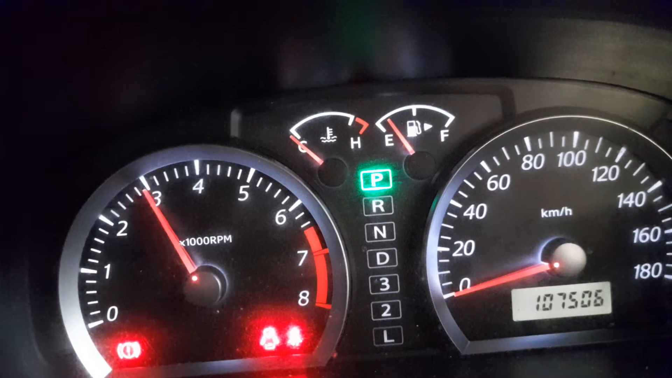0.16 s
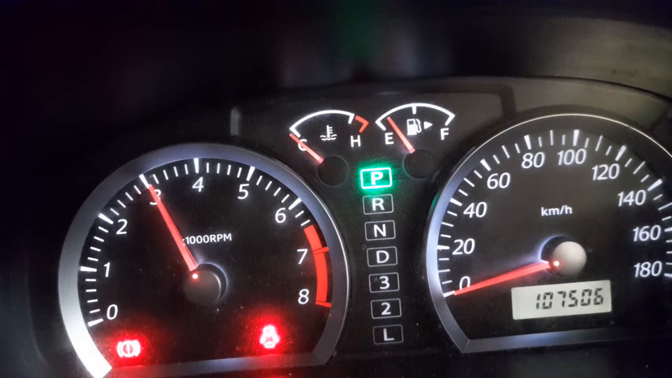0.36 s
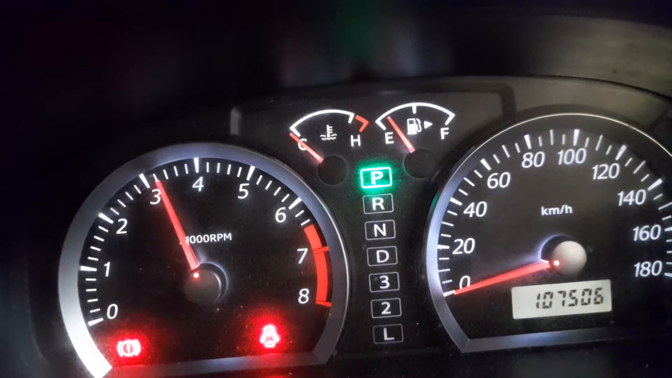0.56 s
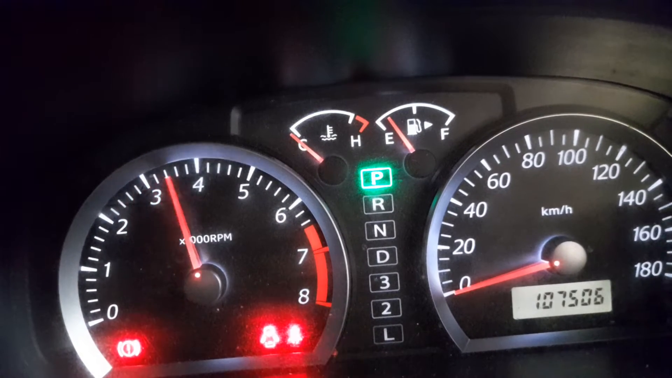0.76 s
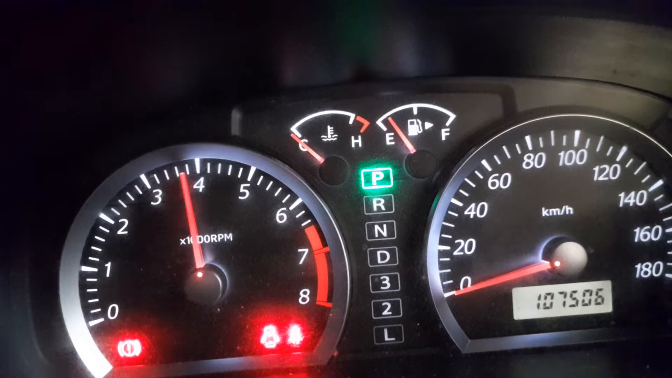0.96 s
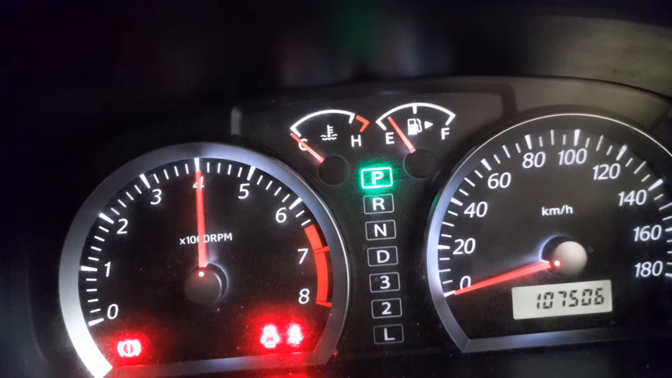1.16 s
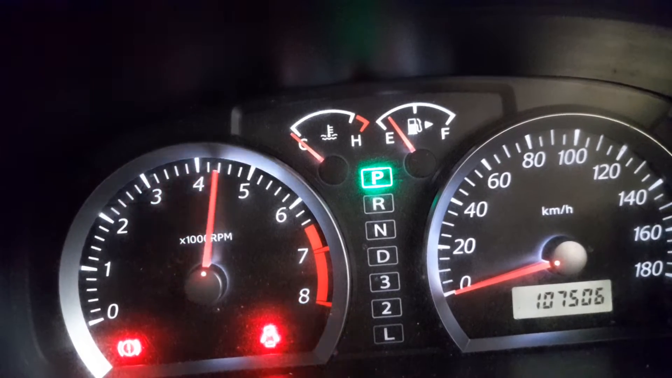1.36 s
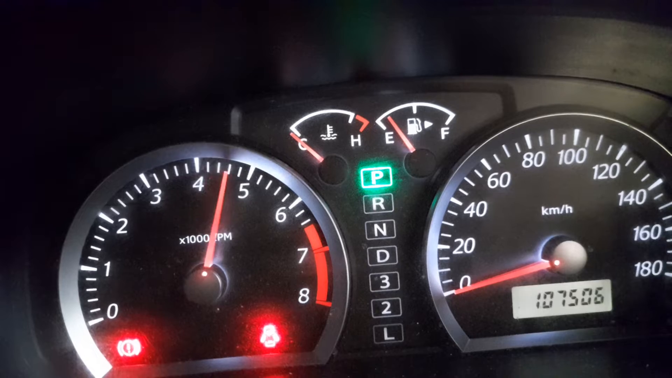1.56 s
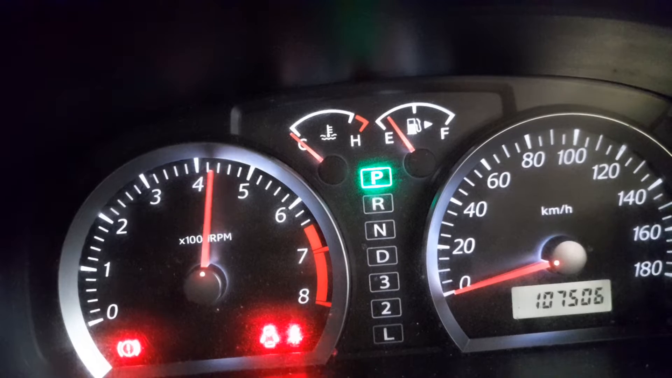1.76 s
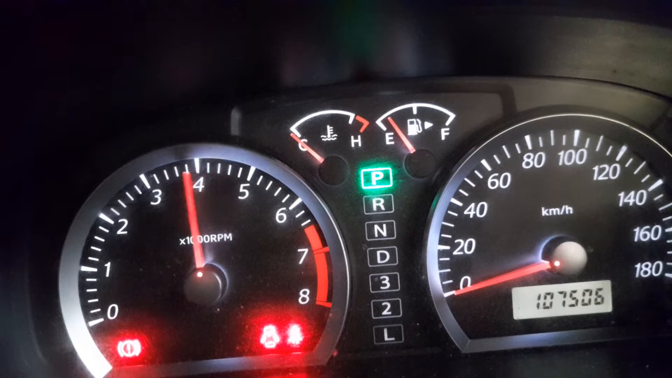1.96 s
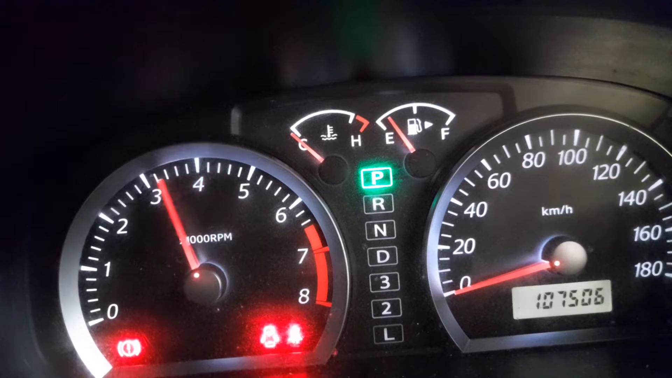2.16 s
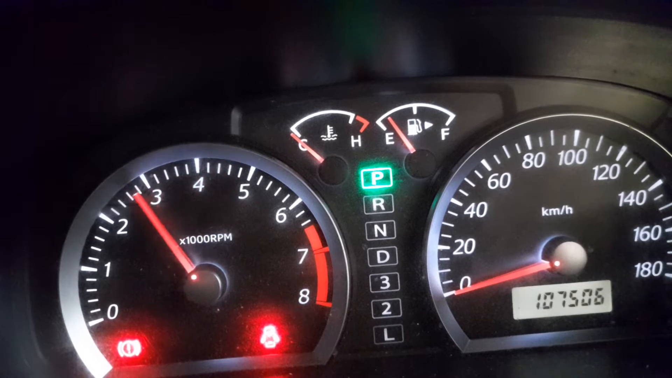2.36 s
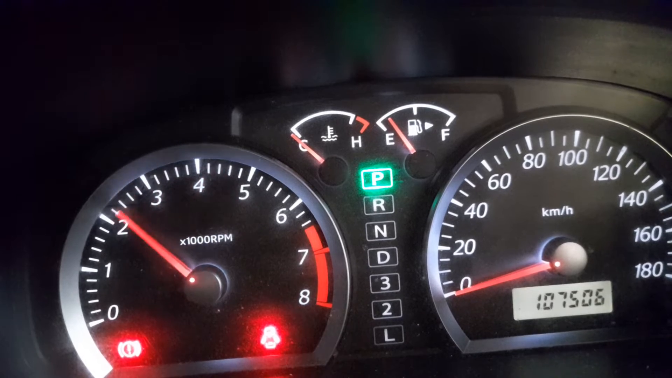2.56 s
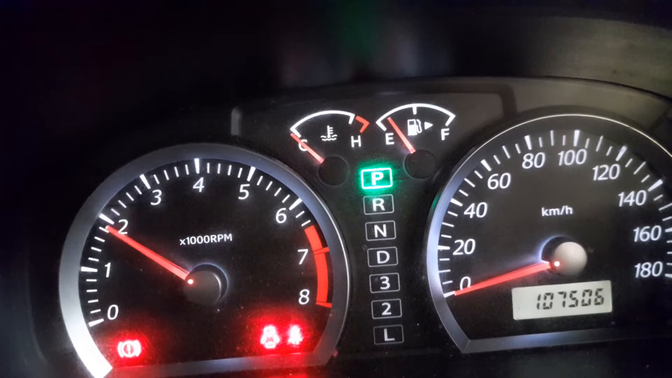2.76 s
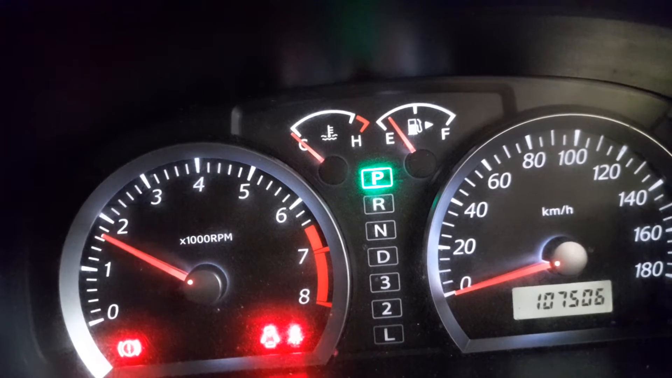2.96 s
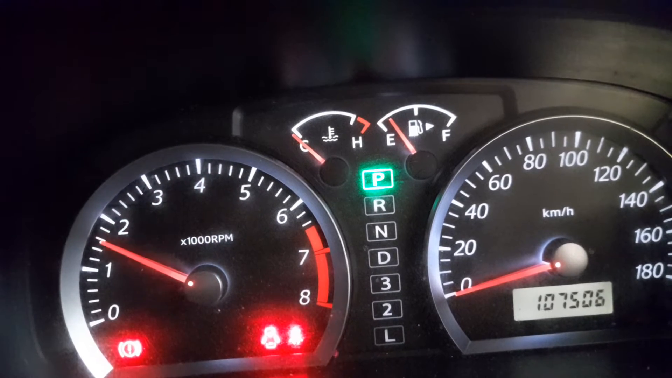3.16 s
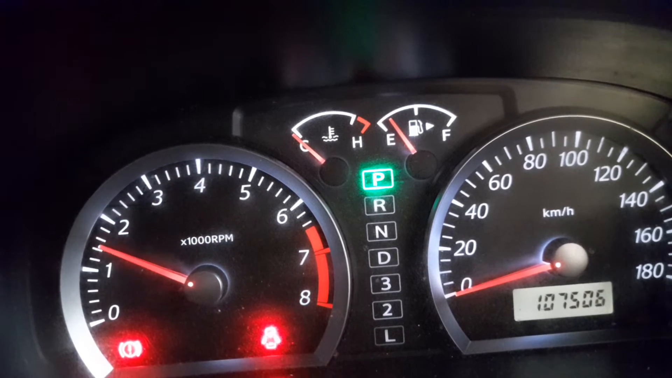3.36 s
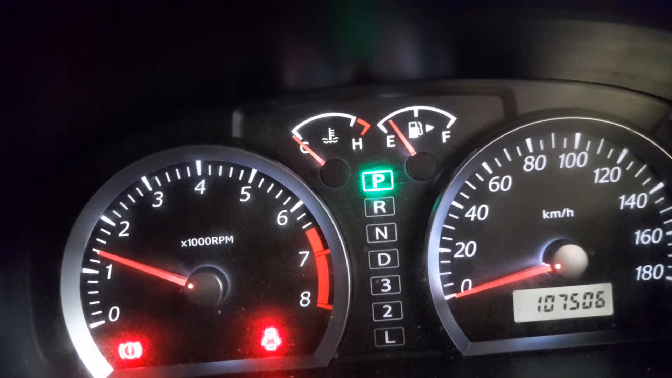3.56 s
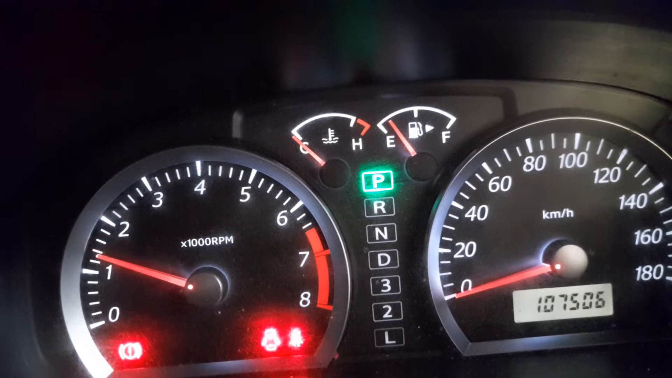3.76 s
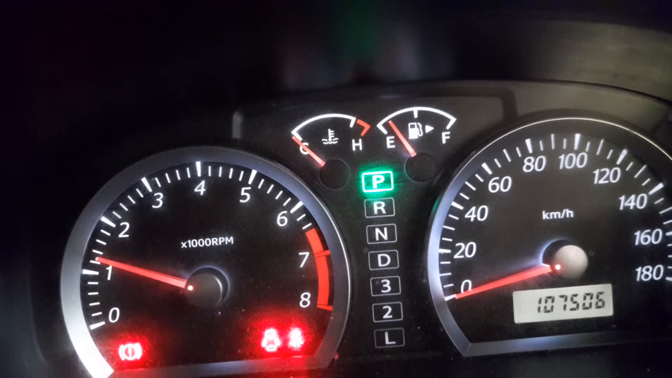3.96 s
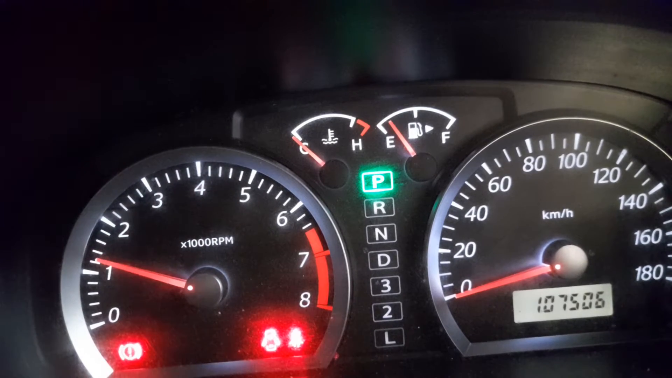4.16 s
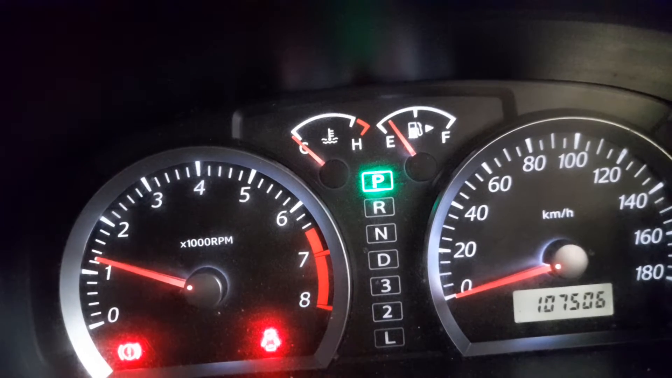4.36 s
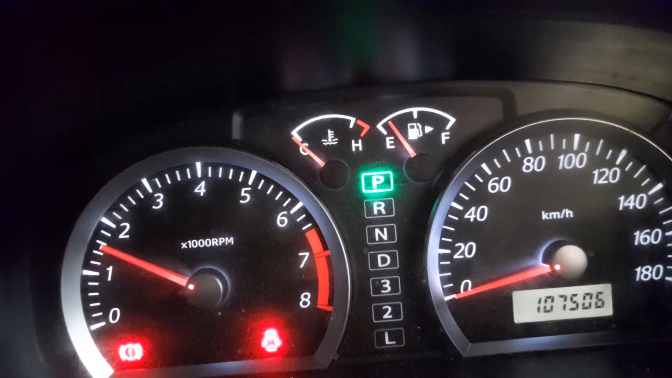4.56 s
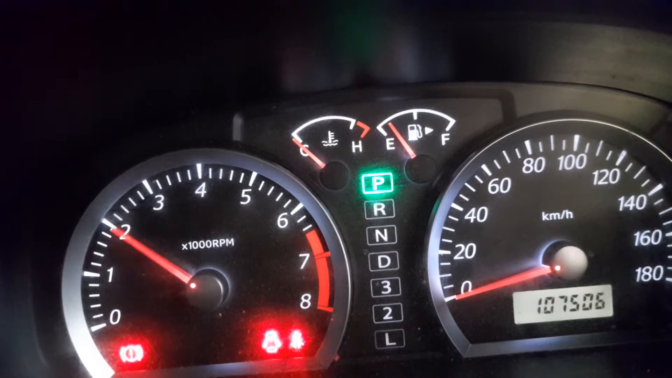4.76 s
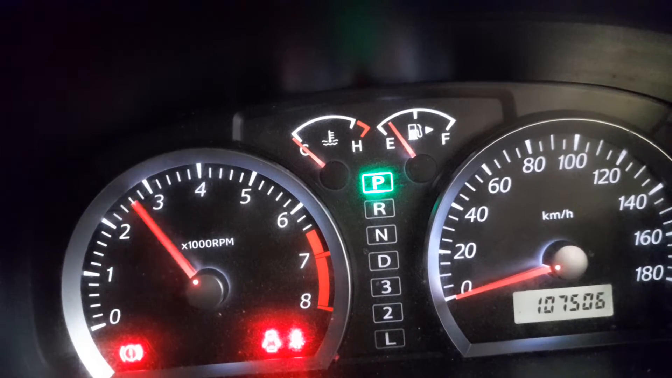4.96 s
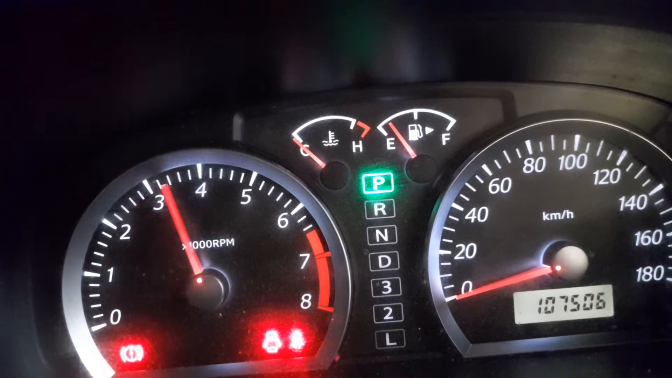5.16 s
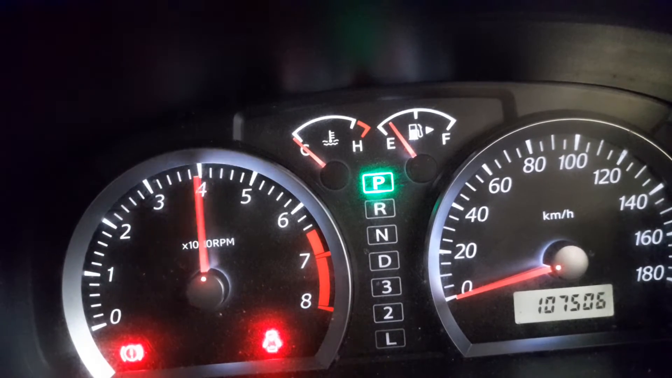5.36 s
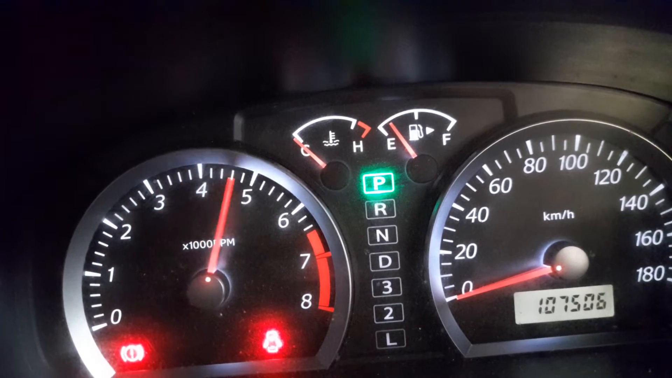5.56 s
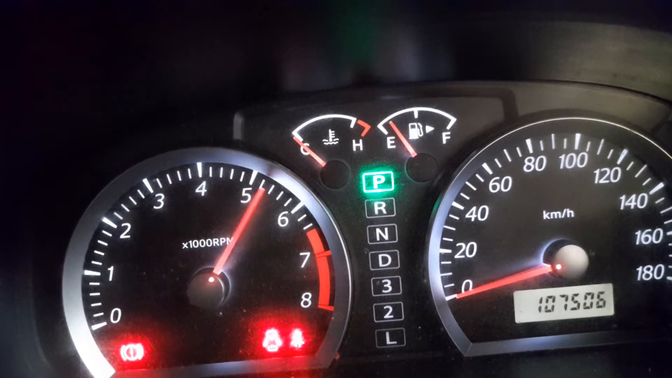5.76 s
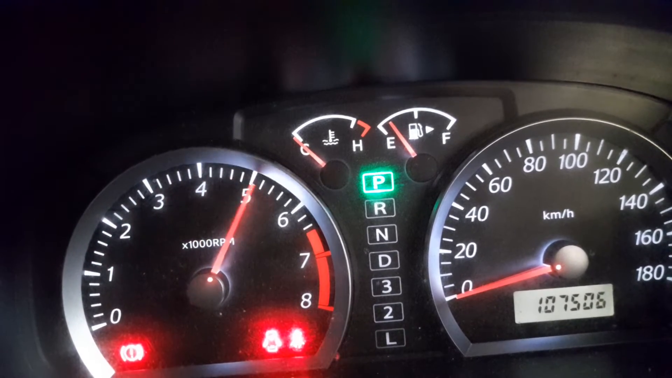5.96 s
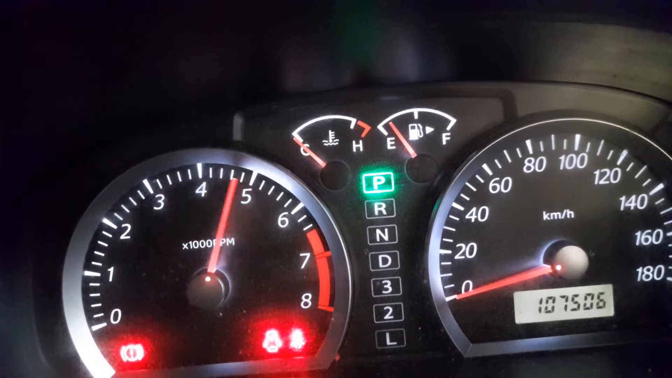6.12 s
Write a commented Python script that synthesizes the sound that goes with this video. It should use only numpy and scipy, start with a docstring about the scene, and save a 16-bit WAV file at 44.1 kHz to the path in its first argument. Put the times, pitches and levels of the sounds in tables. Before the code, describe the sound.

Inside a parked small car, a petrol engine is already running at medium speed and climbs to a boomy, rasping rev. The throttle is released and pitch and loudness slide down to a quiet, low idle with light clatter. Then it is revved again, faster and higher, with whine and bright hiss on top, easing slightly at the end. Close stereo pickup by the dashboard.

```python
"""Small petrol engine revved in park

A four-cylinder engine, heard from the driver's seat, is revved, drops to idle and is revved again.
Sines locked to the crankshaft make the firing boom, shaft orders and whines, swelling in resonances.
Shaped noise makes the roar, valve clatter and the rush of intake and belts, all rising with speed.
A rattle repeated every crank turn adds rasp to the clatter; a bright hiss tops the revs."""
import sys
import numpy as np
from scipy.fft import rfft, irfft, next_fast_len
from scipy.io import wavfile
from scipy.ndimage import uniform_filter1d, map_coordinates

SR = 44100
rng = np.random.default_rng(int(sys.argv[2]) if len(sys.argv) > 2 else 0)


def int16_out(signal):
    """Quantize to a 16-bit WAV file."""
    q = np.round(np.clip(np.atleast_2d(signal).T, -1, 1) * 32767)
    wavfile.write(sys.argv[1], SR, q.astype(np.int16))


N = 272979


def amp(db):
    """Decibels to amplitude gain."""
    return 10 ** (np.asarray(db) / 20)


def unit(x):
    """Scale to rms 1."""
    return x / np.sqrt(np.mean(x ** 2) + 1e-20)


def along(points, hz):
    """Interpolate (Hz, value) points on a log frequency axis."""
    f, v = np.transpose(points)
    return np.interp(np.log(hz + 1), np.log(f + 1), v)


def curves(rows):
    """One value per sample for each column after the time."""
    time_s, *columns = np.transpose(rows)
    return [np.interp(np.arange(N) / SR, time_s, column) for column in columns]


def wobble(rate_hz):
    """Smooth random curve through rate_hz normal-distributed knots a second."""
    coarse = np.arange(0, N + 64, 64)
    knots = rng.standard_normal(int(N * rate_hz / SR) + 4)
    smooth = map_coordinates(knots, [coarse * rate_hz / SR])
    return np.interp(np.arange(N), coarse, smooth)


def filtered(x, response):
    """Multiply the spectrum of x by a complex response of frequency."""
    m = next_fast_len(N + SR // 2)
    spectrum = rfft(x, m) * response(np.fft.rfftfreq(m, 1 / SR))
    return irfft(spectrum, m)[..., :N]


def resonance(f, hz, width_hz):
    """Complex band-pass response of a damped mode, 1 at its centre."""
    return 1j * f * width_hz / (hz * hz - f * f + 1j * f * width_hz)


# left-right likeness of noise: (frequency [Hz], shared fraction of power [0-1])
LIKENESS = [(100, 0.49), (300, .7), (600, 0.6), (1200, 0.22), (2500, 0.11), (8000, 0.039)]


def noise(spectrum, lag_ms):
    """Stereo noise of rms 1 whose shared part reaches the left side lag_ms late."""
    def ports(hz):
        alike = np.clip(along(LIKENESS, hz), 0, 1)
        return amp(along(spectrum, hz)) * np.sqrt([alike, 1 - alike, 1 - alike])
    shared, left, right = filtered(rng.standard_normal((3, N)), ports)
    late = filtered(shared, lambda hz: np.exp(-2j * np.pi * hz * lag_ms / 1000))
    return unit(np.array([late + left, shared + right]))


# body and cabin modes: (centre [Hz], width [Hz], level [dB], phase by which left leads [rad])
BODY_MODES = [(70.7, 14, 4.5, 0.95), (123.5, 17, -3.5, 1), (196.5, 30, -13, -1.06), (330, 24, -7.5, 1),
              (409.8, 6, -1.5, 0.76), (435, 65, -2.5, 0.68), (539.3, 20.4, 0, -1.65)]


def cabin(x):
    """Each body resonance meets the two microphone ports in its own phase."""
    sides = np.array([[.5j], [-.5j]])

    def response(f):
        total = 0
        for hz, width_hz, db, phase in BODY_MODES:
            skirt = 1 + ((f - hz) / (5 * width_hz)) ** 2
            total = total + amp(db) * resonance(f, hz, width_hz) * np.exp(sides * phase) / skirt
        return total
    return filtered(x, response)


# tone at the two ports: (frequency [Hz], left minus right [dB], phase by which left leads [rad])
PORT_BALANCE = [(100, -1, 0), (230, -1, 0), (320, -5, .3), (420, 0, .25), (480, -2, -.2), (540, -2, -1.7),
                (800, -4, -2.7), (1300, -9, -2.6), (1560, 2, -4.2), (2000, -7, -7), (3000, -3, -9)]


def at_ports(x):
    """A mono tone reaches each microphone port with its own level and phase."""
    hz, tilt_db, phase = np.transpose(PORT_BALANCE)
    sides = np.array([[.5], [-.5]])

    def response(f):
        gain = amp(sides * along(np.c_[hz, tilt_db], f))
        gain = gain / np.sqrt(np.mean(gain ** 2, axis=0))
        return gain * np.exp(1j * sides * along(np.c_[hz, phase], f))
    return filtered(x, response)


def growth(law, octaves, throttle):
    """Level in dB of a part that changes with speed and throttle."""
    cruise_db, octave_db, bend_db, throttle_db = law
    return cruise_db + octave_db * octaves + bend_db * octaves ** 2 + throttle_db * throttle


def lines(orders, firings, waver_db, rough_rad):
    """Sines locked to the shaft, each wavering in size and phase."""
    total = 0
    for multiple, db in orders:
        level = amp(db + waver_db * wobble(9))
        phase = 2 * np.pi * (multiple * firings + rng.random()) + rough_rad * wobble(35)
        total = total + level * np.sin(phase)
    return total


# engine speed before smoothing: (time [s], firing rate [Hz])
ENGINE_SPEED = [(0.0, 96.74), (0.48, 106.03), (0.8, 118.82), (1.51, 155.82), (1.97, 111.42), (2.29, 84.39),
                (2.57, 64.79), (2.99, 51.95), (3.52, 43.73), (3.87, 41.52), (4.23, 42.88), (4.51, 54.98),
                (4.72, 71.44), (4.76, 81.96), (5.39, 150.43), (5.72, 182.26), (5.95, 159.46), (6.19, 136.2)]
FLYWHEEL_S = .09  # the flywheel rounds every change of speed
CRUISE_HZ = 100  # firing rate at 3000 rpm, reference for growth laws
BRISK_CLIMB_OCT_PER_S = 1  # takes about three quarters of full throttle


def motion(settle_s=.15):
    """Firing rate, octaves above cruise, and throttle (0-1), which is open while speed climbs."""
    firing_hz = uniform_filter1d(curves(ENGINE_SPEED)[0], int(FLYWHEEL_S * SR), mode="nearest")
    octaves = np.log2(firing_hz / CRUISE_HZ)
    climb = uniform_filter1d(np.gradient(octaves) * SR, int(settle_s * SR), mode="nearest")
    throttle = np.tanh(np.maximum(climb, 0) / BRISK_CLIMB_OCT_PER_S)
    return firing_hz, octaves, throttle


# boom in the cabin before throttle, dips and wander: (firing rate [Hz], peak level [dB])
CABIN_BOOM = [(41.5, -30), (43, -32), (45.5, -32), (52, -32), (60, -27), (72, -14), (85, -10.5), (97, -16),
              (117, -13.5), (129, -21.5), (141, -16), (149, -12.5), (160, -20.5), (180, -17)]
# brief dips of the boom: (time [s], depth [dB], time from centre to half depth [s])
BOOM_DIPS = [(0.404, 13.5, 0.053), (0.665, 6.5, 0.061), (.94, 14, 0.036), (1.325, 4, .16),
             (1.737, 22, 0.016), (1.865, 11.5, 0.058), (2.056, 9, 0.072), (2.318, 18, 0.07),
             (2.58, 8, 0.022), (2.712, 2, 0.018), (2.838, 7, 0.023), (3.457, 11, 0.2), (4.788, 11, 0.021),
             (4.897, 12, 0.023), (5.013, 10.5, .023), (5.132, 3.5, 0.054), (5.362, 4, 0.1),
             (5.524, 22, 0.017), (5.65, 20, 0.017), (5.843, 21, 0.018), (5.937, 12, 0.021)]
BOOM_THROTTLE_DB, BOOM_WANDER_DB = -0.2, .6  # change at full throttle; random wander


def firing_note(firing_hz, throttle, firings):
    """The strongest line, one cycle per firing: booms by pitch and throttle, with brief dips."""
    t = np.arange(N) / SR
    dip_db = sum(db / (1 + ((t - s) / half_s) ** 4) for s, db, half_s in BOOM_DIPS)
    boom_db = along(CABIN_BOOM, firing_hz) + BOOM_THROTTLE_DB * throttle - dip_db
    boom = amp(boom_db + BOOM_WANDER_DB * wobble(49)) * np.sin(2 * np.pi * firings)
    return boom * amp([[-.6], [.6]])


# resonances carrying clean lines to the seat: (centre [Hz], width at half amplitude [Hz], level [dB])
SEAT_PATHS = [(73.8, 4.7, -1.5), (135.2, 45, 0), (226.6, 22, -5), (301.4, 53, -10), (406, 32.7, -4.5),
              (438, 27, -5.5), (540.7, 20, -7), (803, 11, -6), (1260, 40, -7.5), (1309, 33, -5),
              (1385, 34, -1), (1490, 130, -9), (1985, 170, -7), (2225, 72, -11), (2370, 66, -3.5)]


def path_db(hz, floor_db=-28):
    """How well the resonances carry a tone of this pitch."""
    gain = amp(floor_db)
    for centre_hz, width_hz, db in SEAT_PATHS:
        gain = gain + amp(db) / (1 + (2 * (hz - centre_hz) / width_hz) ** 2)
    return 20 * np.log10(gain)


# crank, 2nd and 3rd harmonic, oil pump, timing chain, pump overtone: (multiple of firing rate)
CLEAN_ORDERS = (.5, 2, 3, 4.5, 9, 13.5)
# growth before path gain, same order:
# (level at cruise [dB], slope [dB/octave], bend [dB/octave^2], rise at full throttle [dB])
CLEAN_LAWS = [(-37.5, 14, -8, 14), (-37.5, 9, 5.2, 12), (-33.5, 14.5, 7, -2.5), (-28, 10, -6, 4.5),
              (-31, 7, 2.6, 5), (-32.5, 6.5, -2, 3.5)]


def strong_orders(firing_hz, octaves, throttle, firings, flutter_db=3.0):
    """Clean crank-locked lines swell where they meet a resonance; high ones flutter most."""
    orders = []
    for multiple, law in zip(CLEAN_ORDERS, CLEAN_LAWS):
        level_db = growth(law, octaves, throttle) + path_db(multiple * firing_hz)
        flutter = flutter_db * np.sqrt(multiple / max(CLEAN_ORDERS)) * wobble(30)
        orders.append((multiple, level_db + flutter))
    return at_ports(lines(orders, firings, waver_db=2.7, rough_rad=0.16))


# lines from unequal cylinders: (multiple of firing rate, relative level [dB])
CRANK_ORDERS = [(.75, -38), (1.25, -46), (1.5, -44), (1.75, -36), (2.25, -36), (2.5, -37), (2.75, -34),
                (3.25, -38), (3.5, -35), (3.75, -45), (4, -36), (4.25, -46), (5, -48)]
FLARE_HZ, FLARE_WIDTH_HZ, FLARE_DB = 147.6, 7.4, 7  # firing rate of hardest shake under throttle


def crank_shake(firing_hz, octaves, throttle, firings):
    """Unequal cylinders shake the block at quarters of the firing rate, heard through the body."""
    flare_db = FLARE_DB / (1 + ((firing_hz - FLARE_HZ) / FLARE_WIDTH_HZ) ** 2)
    level_db = -1 + 7 * octaves + (3.0 + flare_db) * throttle
    return cabin(lines(CRANK_ORDERS, firings, waver_db=2.0, rough_rad=0.17) * amp(level_db))


# belt and alternator whines: (multiple of firing rate, relative level [dB])
WHINE_ORDERS = [(10.8, -53), (14.9, -45), (18, -46), (22.4, -44), (26.95, -52)]
# bulkhead transmission of the whines: (frequency [Hz], gain [dB])
BULKHEAD_GAIN = [(900, -6), (1130, -6), (1250, 3.5), (1550, -7.5), (1750, -2.5), (2100, -10.5),
                 (2500, -3.5), (3400, -0.5), (5000, -22)]


def drive_whine(octaves, throttle, firings):
    """Faint belt and alternator lines grow with speed and throttle, filtered by the bulkhead."""
    level_db = -2 + 4 * octaves + 5 * throttle
    whine = lines(WHINE_ORDERS, firings, waver_db=3, rough_rad=.25) * amp(level_db)
    return at_ports(filtered(whine, lambda hz: amp(along(BULKHEAD_GAIN, hz))))


# belt drive singing: (multiple of firing rate, level at idle [dB])
BELT_SONG = [(36, -52), (40.4, -60), (121.5, -51)]


def idle_song(firing_hz, firings, idle_hz=41.5, idle_width_hz=1.3):
    """The belt drive sings high lines that fade as the speed leaves idle."""
    idling = 1 / (1 + (np.maximum(firing_hz - idle_hz, 0) / idle_width_hz) ** 2)
    return at_ports(idling * lines(BELT_SONG, firings, waver_db=4, rough_rad=0.29))


# low rumble: (frequency [Hz], relative density [dB/Hz])
RUMBLE_SPECTRUM = [(20, -27), (42, -20), (70, 2), (130, -5), (200, -8), (290, -9), (360, -10.5),
                   (450, -9.5), (580, -16), (720, -33.5), (1500, -42.5)]


def combustion_roar(clatter_db, roar_growth=0.68):
    """Body-coloured roar and low rumble grow with effort, more slowly than the clatter."""
    effort = amp(roar_growth * (clatter_db - clatter_db.max()))
    roar = amp(-35) * unit(cabin(rng.standard_normal(N)))
    rumble = amp(-27.0) * noise(RUMBLE_SPECTRUM, lag_ms=0.18)
    return effort * (roar + rumble)


# valve clatter: (frequency [Hz], relative density [dB/Hz])
CLATTER_SPECTRUM = [(450, -10), (620, -2.5), (900, -3.5), (1100, -2.5), (1330, -3.5), (1600, -1.5),
                    (2000, 1), (2400, -4.5), (3000, -7.5), (4200, -25)]


def valve_rasp(firing_hz, firings, count=140, size=8192):
    """The valve train repeats one jagged rattle every crank turn: a dense comb of lines."""
    harmonics = np.exp(2j * np.pi * rng.random((2, count))) * (np.arange(count) > 0)
    shapes = irfft(harmonics, size)
    crank_phase = firings / 2 % 1  # two firings a turn
    rattle = np.array([np.interp(crank_phase, np.arange(size) / size, shape) for shape in shapes])
    # valves land harder as the speed rises
    return unit(filtered(rattle * firing_hz, lambda hz: amp(along(CLATTER_SPECTRUM, hz))))


# dashboard modes: (centre [Hz], width [Hz], level over direct sound [dB])
DASH_MODES = [(856, 18, -2), (1048, 30, 6), (1216, 22.5, 9), (1288, 35, 5), (1562, 15, 5), (1704, 19, -6.5),
              (1958, 20, -4.5), (2294, 10, -15), (2470, 17, -21), (4150, 120, -10)]


def dashboard(x):
    """Panels ring at narrow frequencies on top of what passes through them."""
    def response(f):
        return 1 + sum(amp(db) * resonance(f, hz, width_hz) for hz, width_hz, db in DASH_MODES)
    return filtered(x, response)


RASP_DB, RASP_OCTAVE_DB = -7, 3  # rasp gain at cruise, and its rise per octave
CLATTER_WANDER_DB = .65


def valve_clatter(clatter_db, firing_hz, octaves, firings, throb=0.11):
    """Loose noise throbbing once a firing plus crank-locked rasp, ringing the dashboard."""
    loose = noise(CLATTER_SPECTRUM, lag_ms=0.47) * (1 + throb * np.cos(2 * np.pi * firings))
    rasp = amp(RASP_DB + RASP_OCTAVE_DB * octaves) * valve_rasp(firing_hz, firings)
    level = amp(clatter_db + CLATTER_WANDER_DB * wobble(12))
    return level * unit(dashboard(loose + rasp)) * amp([[-2.1], [1.9]])


# intake and belt rush: (frequency [Hz], relative density [dB/Hz])
RUSH_SPECTRUM = [(2200, -13), (3200, 0.5), (4200, 1), (5000, -1), (6600, -3.5), (7450, -0.5), (8300, -17.5),
                 (10000, -17), (11500, -10), (15600, -9)]
# rush growth before a fixed gain:
# (level at cruise [dB], slope [dB/octave], bend [dB/octave^2], rise at full throttle [dB])
RUSH_GROWTH = (-46, 12.5, 3.5, 1.03)
RUSH_GAIN_DB, RUSH_WANDER_DB = 4, .4


def air_rush(octaves, throttle, firings, flutter=0.033):
    """Noise of intake and belts, rising with speed and fluttering once a firing."""
    level_db = growth(RUSH_GROWTH, octaves, throttle) + RUSH_GAIN_DB + RUSH_WANDER_DB * wobble(8.8)
    beat = 1 + flutter * np.cos(2 * np.pi * firings)
    return amp(level_db) * noise(RUSH_SPECTRUM, lag_ms=0.513) * beat * amp([[-1.7], [1.5]])


# clatter growth, which also drives the roar:
# (level at cruise [dB], slope [dB/octave], bend [dB/octave^2], rise at full throttle [dB])
CLATTER_GROWTH = (-38.5, 11.5, 2.1, 2)


def engine_bay(firing_hz, octaves, throttle, firings):
    """Sum of roar, clatter, rush and hiss, the first two sharing one growth with speed."""
    clatter_db = growth(CLATTER_GROWTH, octaves, throttle)
    roar = combustion_roar(clatter_db)
    clatter = valve_clatter(clatter_db, firing_hz, octaves, firings)
    rush = air_rush(octaves, throttle, firings)
    return roar + clatter + rush + intake_hiss(firing_hz)


def intake_hiss(firing_hz, octave_db=30):
    """A bright hiss that rises steeply and shows only at the top of a rev."""
    level_db = -37 + octave_db * np.log2(firing_hz / firing_hz.max())
    # (frequency [Hz], relative density [dB/Hz])
    spectrum = [(5000, -15), (8500, -2), (10500, 3.5), (15500, -5)]
    return amp(level_db) * noise(spectrum, lag_ms=0.49) * amp([[-1.6], [1.6]])


def scene():
    """One speed curve drives every part of the engine."""
    firing_hz, octaves, throttle = motion()
    firings = np.cumsum(firing_hz) / SR  # running count, two per crank turn
    engine = firing_hz, octaves, throttle, firings
    tones = firing_note(firing_hz, throttle, firings) + strong_orders(*engine) + crank_shake(*engine)
    whines = drive_whine(octaves, throttle, firings) + idle_song(firing_hz, firings)
    return tones + whines + engine_bay(*engine)


TOP_HZ = 15750


def record(dry):
    """The recorder keeps nothing above its band limit."""
    return filtered(dry, lambda hz: hz < TOP_HZ)


dry = scene()
out = record(dry)
int16_out(out)
```